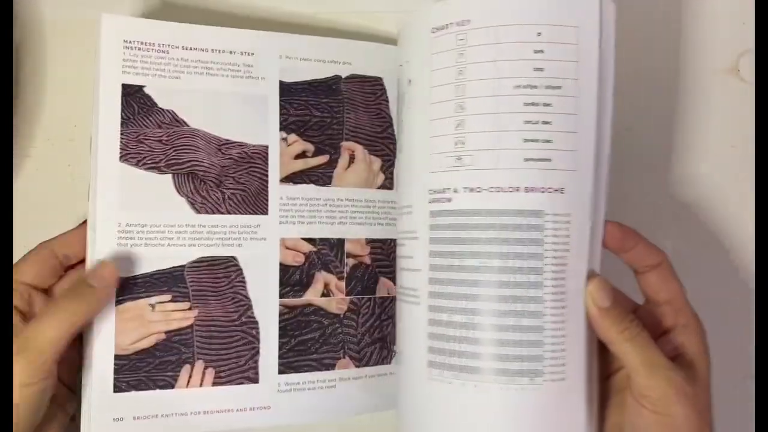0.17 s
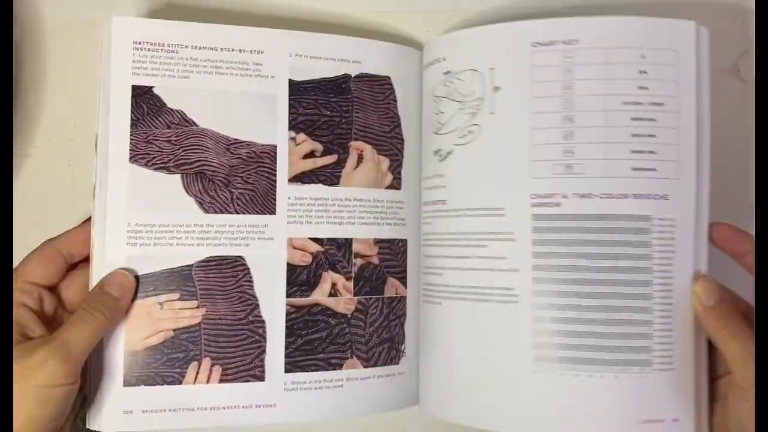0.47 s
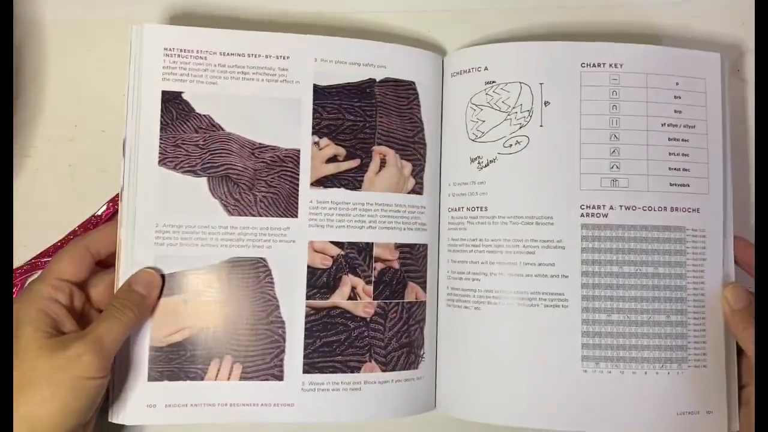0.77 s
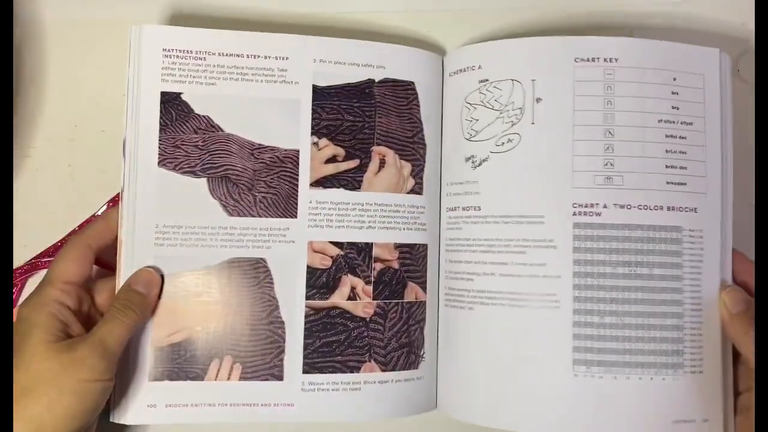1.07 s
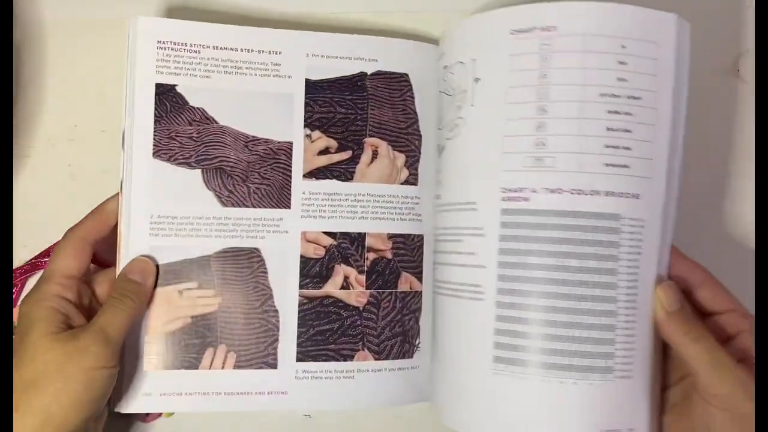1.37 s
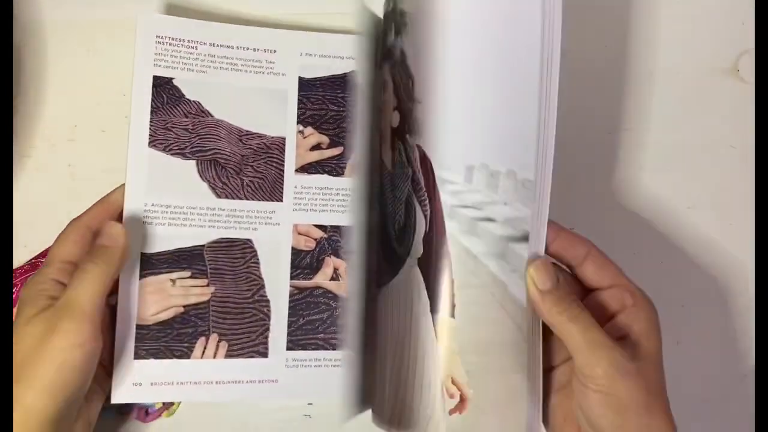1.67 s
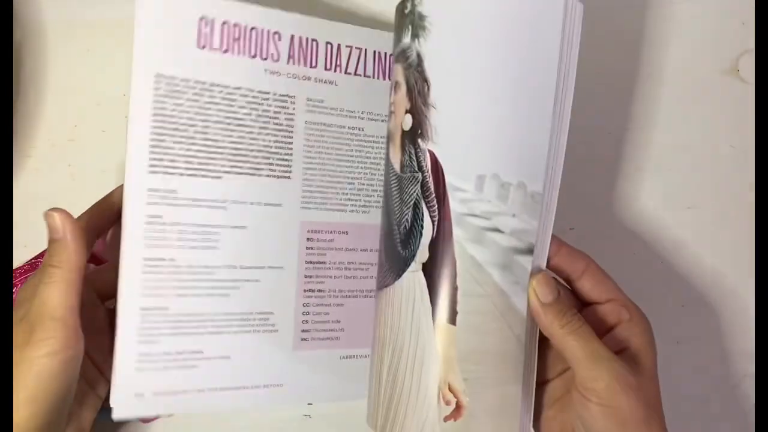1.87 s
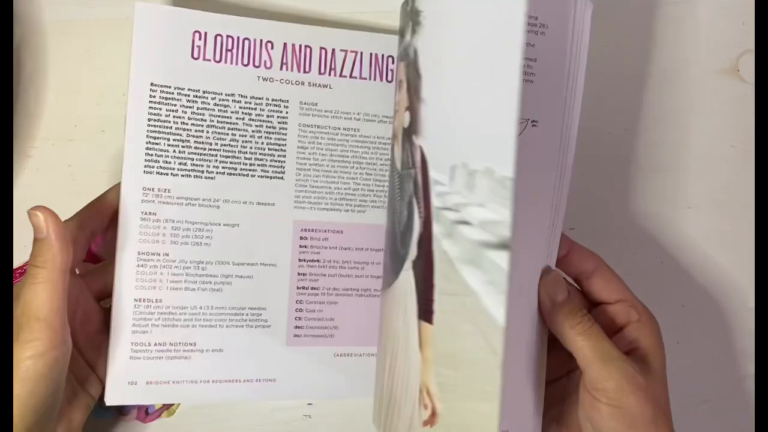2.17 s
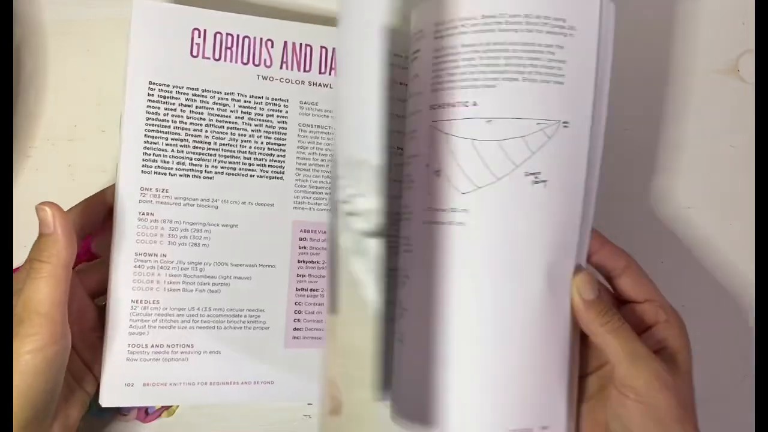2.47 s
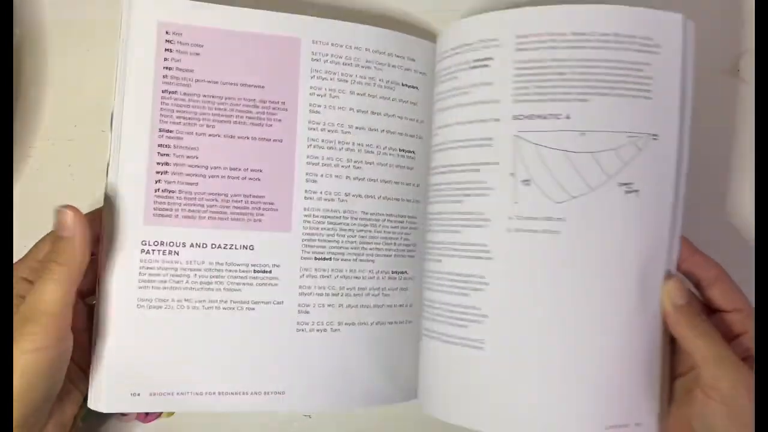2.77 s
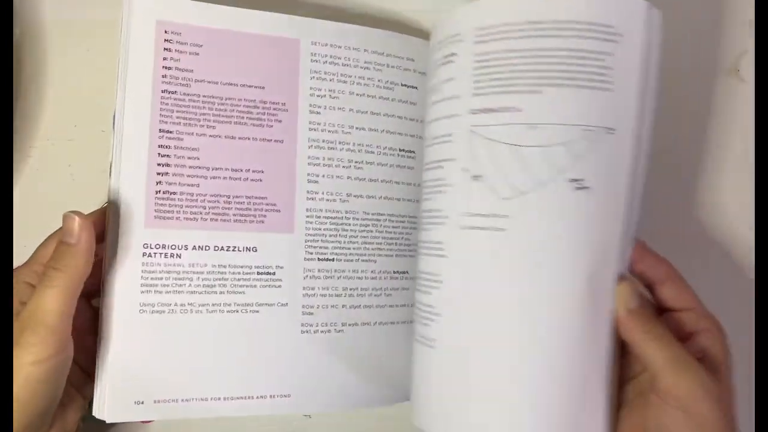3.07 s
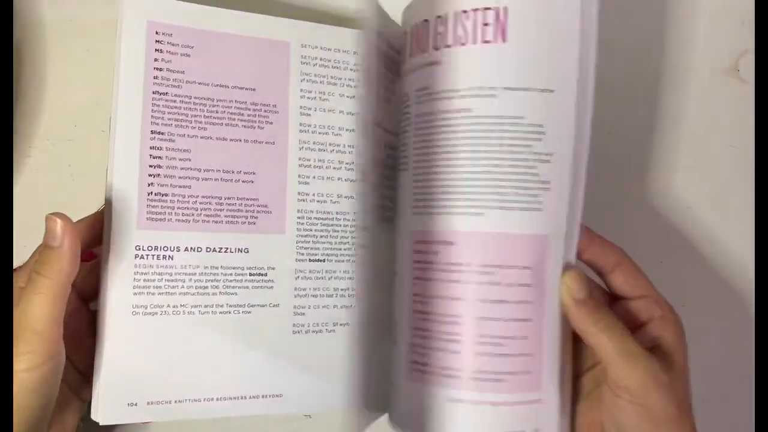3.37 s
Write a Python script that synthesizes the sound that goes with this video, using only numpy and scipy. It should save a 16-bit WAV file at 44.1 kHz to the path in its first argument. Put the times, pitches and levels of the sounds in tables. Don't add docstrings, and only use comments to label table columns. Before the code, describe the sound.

Book pages being leafed through by hand: soft dull swishes, brighter scrapes and small crisp edge snaps, strongest around the middle, with low puffs of air, close stereo microphone in a quiet room with faint ventilation rumble.

```python
import sys
import numpy as np
from scipy import signal
from scipy.fft import rfft, irfft
from scipy.io import wavfile
from scipy.ndimage import uniform_filter1d

SR = 44100
rng = np.random.default_rng(int(sys.argv[2]) if len(sys.argv) > 2 else 0)


def magnitude_from_level(level_db):
    exponent = np.asarray(level_db, float) / 20
    return 10 ** exponent


def digitize_waveform(pressure):
    field = np.atleast_2d(pressure).T
    bounded = np.clip(field, -1, 1)
    quanta = np.round(bounded * 32767).astype(np.int16)
    wavfile.write(sys.argv[1], SR, quanta)


N = 155232


def evened(x):
    return x / np.sqrt(np.mean(x ** 2) + 1e-20)


def read(points, hz):
    table_hz, value = np.transpose(points)
    return np.interp(np.log(hz + 1), np.log(table_hz + 1), value)


def drift(slow_hz, fast_hz, t):
    total = 0
    for hz in np.geomspace(slow_hz, fast_hz, num=24):
        total = total + np.sin(2 * np.pi * (hz * t + rng.random())) / np.sqrt(hz)
    return evened(total)


def ring(x, hz, width_hz):
    b, a = signal.iirpeak(hz, max(hz / min(width_hz, 7000), 0.3), SR)
    return signal.lfilter(b, a, x)


# resonance in Hz, width in Hz, boost in dB.
HOUSING = [(597, 210, 1), (1410, 42, 0.5), (2220, 140, 2), (2570, 98, 2.5), (3460, 100, 1),
           (4860, 330, 0.5), (5500, 510, 0)]
# frequency in Hz, lead in radians.
LEFT_LEAD = [(400, 0), (2000, .45), (2800, 1.), (5000, .45), (7450, 3.14), (10500, 6.28), (13500, 9.42),
             (16000, 12.4)]


def ports(pair, likeness):
    hz = np.fft.rfftfreq(pair.shape[1], 1 / SR)
    housing_db = sum(db / (1 + (2 * (hz - f) / width) ** 2) for f, width, db in HOUSING)
    left, other = rfft(pair) * magnitude_from_level(housing_db)
    same = np.clip(read(likeness, hz), 0, 1)
    lead_hz, lead = np.transpose(LEFT_LEAD)
    right = same * left + np.sqrt(1 - same ** 2) * other
    right = right * np.exp(-1j * np.interp(hz, lead_hz, lead))
    return irfft(np.array([left, right]), pair.shape[1])


# frequency in Hz, level in dB.
VENTILATION = [(25, -92), (48, -72), (300, -83.5), (380, -96), (620, -104), (1100, -101), (2000, -110),
               (4000, -121), (16000, -135)]
# pitch in Hz, width in Hz, level in dB.
ROOM_MODES = [(50.7, 4.9, -61), (74.2, 19.2, -60.5), (125, 34.9, -65), (197.3, 31.7, -69.5),
              (264.8, 40.2, -74), (461.7, 62, -89), (792, 66, -89), (950, 200, -95), (2110, 29, -108)]
# frequency in Hz, likeness 0-1.
AIR_LIKENESS = [(60, .9997), (100, .9985), (170, .988), (340, .93), (560, .15), (1300, .1), (2000, .6),
                (3000, .35), (7000, .85)]


def air():
    hz = np.fft.rfftfreq(N, 1 / SR)
    power = magnitude_from_level(read(VENTILATION, hz)) ** 2
    for mode_hz, width_hz, db in ROOM_MODES:
        power += magnitude_from_level(db) ** 2 / (1 + (2 * (hz - mode_hz) / width_hz) ** 4)
    noise = irfft(rfft(rng.standard_normal((2, N))) * np.sqrt(power), N)
    level_db, swell_db = 39, 0.4
    return ports(noise, AIR_LIKENESS) * magnitude_from_level(level_db + swell_db * drift(0.43, 5, np.arange(N) / SR))


def whine():
    t = np.arange(N) / SR
    base_hz, step_hz, up_s, down_s = 13437, 227, 1.66, 3.35
    level_db, wobble_db = -92, 5.5
    hz = base_hz + step_hz * ((t > up_s) & (t < down_s))
    tone = np.sqrt(2) * np.sin(2 * np.pi * np.cumsum(hz) / SR)
    tone *= magnitude_from_level(level_db + wobble_db * drift(0.25, 11.0, t))
    return np.array([tone, -tone])


# start in seconds, length in seconds, share of the length spent rising 0-1,
# dull swish level in dB, bright scrape level in dB.
PAGE_STROKES = [(.0, 0.64, 0.15, -75, -97), (0.201, 0.084, 0.32, -83, -78.5),
                (0.22, 0.99, 0.22, -71.5, -87.5), (0.485, 0.32, 0.45, -60.5, -99),
                (0.557, .14, 0.46, -66, -97), (.92, 0.11, 0.65, -81, -73), (0.753, 0.26, 0, -76, -83),
                (0.842, 0.12, 0.44, -65.5, -73), (0.9, 0.22, 0.24, -68.5, -65.5),
                (0.976, 0.45, 0.49, -63.5, -71.5), (1.3, 0.31, 0.2, -70.5, -76.5),
                (1.419, 0.1, 0.16, -65, -73), (1.466, 0.24, 0.29, -71.5, -71),
                (1.597, 0.045, 0.23, -59.5, -68), (1.616, 0.82, 0.09, -74.5, -82),
                (1.773, 0.2, 0.56, -68.5, -74.5), (2.181, 0.44, 0.68, -70, -81),
                (2.42, 0.41, 0.54, -69.5, -79), (2.578, .12, 0.4, -70.5, -81),
                (2.324, 0.14, 0.24, -87, -81.5), (2.717, 0.41, 0.53, -78.5, -89.5),
                (2.986, 0.2, 0.44, -76, -74.5), (3.104, 0.18, 0.1, -73, -73), (3.2, 0.27, 0.46, -83, -90.5),
                (3.387, 0.31, 0.1, -75, -79)]


def pressure(column):
    t, power = np.arange(N) / SR, np.zeros(N)
    softness = 1.3
    for row in PAGE_STROKES:
        start, length, rise = row[:3]
        progress = (t - start) / length
        top = np.clip(rise, 0.05, 0.95)
        slope = np.clip(np.minimum(progress / top, (1 - progress) / (1 - top)), 0, 1)
        power += (magnitude_from_level(row[column]) * np.sin(np.pi / 2 * slope) ** softness) ** 2
    return np.sqrt(power)


def friction(colour, column):
    slips_per_s, spread_db, smooth_share, flutter_db = 2600, -3, 0.69, 0.93
    patch_db, rub_top_hz = 3, 15800
    slips = magnitude_from_level(spread_db * np.minimum(rng.exponential(1, N), 6)) * (rng.random(N) < slips_per_s / SR)
    grain = smooth_share + (1 - smooth_share) * evened(uniform_filter1d(slips, size=5))
    drive = grain * rng.standard_normal((2, N))
    drive *= magnitude_from_level(flutter_db * drift(12, 120, np.arange(N) / SR))
    hz, _, z = signal.stft(drive, SR, nperseg=512, noverlap=384)
    hz = hz[:, None]
    patches = evened(uniform_filter1d(rng.standard_normal(z.shape[1:]), size=20, axis=1))
    shape = magnitude_from_level(read(colour, hz) + patch_db * patches) * (hz < rub_top_hz)
    rub = signal.istft(z * shape, SR, nperseg=512, noverlap=384)[1][:, :N]
    return evened(rub) * pressure(column)


# frequency in Hz, level in dB.
SWISH_COLOUR = [(250, -12.5), (480, 3.5), (850, 4.5), (1380, -1), (2100, -4.5), (3300, -8.5), (5500, -14.5),
                (15000, -53.5)]
# frequency in Hz, level in dB.
SCRAPE_COLOUR = [(1200, -9.5), (2500, -1), (4300, -5.5), (5300, 0.5), (6700, -4.5), (7600, -6.5),
                 (11000, -9), (15800, -12.5)]
# frequency in Hz, likeness 0-1.
PAPER_LIKENESS = [(500, .5), (1000, .35), (2000, .85), (2800, .4), (4000, .75), (7500, .88), (9000, .75),
                  (13000, .88)]


def pages():
    swish = friction(SWISH_COLOUR, column=3)
    scrape = friction(SCRAPE_COLOUR, column=4)
    return ports(swish + scrape, PAPER_LIKENESS)


def block():
    band = signal.butter(4, (122.5, 292), "band", fs=SR, output="sos")
    groan = evened(signal.sosfilt(band, rng.standard_normal(N)))
    return groan * magnitude_from_level(11) * uniform_filter1d(pressure(column=4), size=9000)


# time in seconds, body level in dB, body pitch in Hz, treble level in dB,
# time to fade by 60 dB in seconds.
EDGE_SNAPS = [(0.0313, -63, 1500, -93, 0.014), (.055, -65, 700, -90, 0.029), (.228, -63, 2500, -81, 0.018),
              (0.7738, -58, 2630, -87, 0.0084), (0.8774, -59, 2600, -60, 0.017),
              (1.074, -57, 2400, -74, 0.024), (1.0787, -53, 3500, -49.5, 0.0093),
              (1.0795, -51, 880, -58, 0.029), (1.3231, -46, 14000, -61, 0.032),
              (1.3244, -54, 950, -72, .03), (1.4373, -47, 2750, -36.5, 0.0072),
              (1.4395, -58, 1900, -59, 0.022), (1.6073, -81, 2370, -66, 0.02),
              (1.611, -59, 2130, -58, 0.03), (2, -64, 3100, -60, 0.0046), (2.018, -59, 4500, -51, 0.012),
              (2.0194, -50.5, 1250, -75, 0.019), (2.9232, -59, 885, -75, 0.011),
              (3.1315, -58, 1970, -66, 0.032), (3.1339, -57, 2000, -59, 0.011),
              (3.1451, -52, 5770, -41.5, 0.01), (3.1452, -45.5, 1530, -74, 0.015),
              (3.4084, -74, 1500, -75, .012)]
# pitch in Hz, width in Hz, level in dB.
CRACK_MODES = [(3400, 1600, -4.5), (5280, 470, -4), (8920, 2880, 1.5), (11170, 3900, -0.5),
               (14000, 1500, -12)]
# frequency in Hz, likeness 0-1.
SNAP_LIKENESS = [(500, .9), (5500, .9), (7000, .88), (9000, .85), (13500, .65), (16000, .8)]


def snaps():
    rise_s, tail_db, tail_s = 0.00057, -13, 0.05
    flick = 13
    body_width, body_late_s = 0.69, 0.00034
    echo_s, echo_db = 0.0057, -18
    t, out = np.arange(4000) / SR, np.zeros((2, N + 5000))
    for start, body_db, hz, treble_db, fade_s in EDGE_SNAPS:
        shape = magnitude_from_level(-60 * t / fade_s) + magnitude_from_level(tail_db - 60 * t / tail_s)
        burst = rng.standard_normal((2, len(t))) * shape * np.minimum(t / rise_s, 1)
        burst[:, round(rise_s * SR)] += flick * shape[0] / 2
        treble = 0
        for f, width, db in CRACK_MODES:
            treble = treble + magnitude_from_level(db) * evened(ring(ring(burst, f, width), f, width))
        body = ring(ring(burst, hz, hz * body_width), hz, hz * body_width)
        body = np.roll(body, round(body_late_s * SR), axis=1)
        sound = magnitude_from_level(body_db) * body / abs(body[0]).max()
        sound += magnitude_from_level(treble_db) * treble / abs(treble[0]).max()
        for late_s, db in ((0, 0), (echo_s, echo_db)):
            out[:, round((start + late_s) * SR):][:, :len(t)] += magnitude_from_level(db) * sound
    return ports(out[:, :N], SNAP_LIKENESS)


# start in seconds, length in seconds, pitch in Hz, level in dB.
AIR_PUSHES = [(0.082, 0.11, 79.4, -44), (.23, 0.078, 78.7, -39), (0.432, 0.15, 79, -53.5),
              (0.664, 0.088, 68.7, -46), (0.823, 0.16, 80.2, -45), (1.038, 0.063, 77, -41.5),
              (1.422, 0.067, 77.7, -42), (1.959, 0.05, 77, -43), (2.169, 0.12, 71.6, -44.5),
              (2.733, 0.065, 72, -45.5), (2.841, 0.11, 76.3, -42), (.1, 0.083, 140, -49.5),
              (0.782, 0.095, 135.6, -46), (.88, .1, 138.7, -48), (1.277, 0.11, 262.2, -55),
              (2.58, 0.097, 140, -51.5), (3.22, 0.12, 77.3, -46), (3.331, 0.15, 200.3, -55.5)]


def pushes():
    out = np.zeros(N + SR)
    for start, length, hz, db in AIR_PUSHES:
        t = np.arange(0, length, 1 / SR)
        swell = np.sin(np.pi * t / length)
        out[round(start * SR):][:len(t)] += magnitude_from_level(db) * swell * np.sin(2 * np.pi * hz * t)
    return out[:N]


def scene():
    return air() + whine() + pages() + block() + snaps() + pushes()


def joint_gate(x):
    from_hz, under_db, keep_db = 6000, -6.5, -95
    top_from_hz, top_keep_db, dropped_db = 13850, -112, -24
    sum_and_difference = np.array([x[0] + x[1], x[0] - x[1]]) / 2
    hz, _, z = signal.stft(sum_and_difference, SR, nperseg=1024, noverlap=768)
    hz = hz[:, None]
    power = uniform_filter1d(uniform_filter1d(abs(z) ** 2, size=14, axis=1), size=5, axis=2)
    level_db = 10 * np.log10(abs(power) + 1e-20)
    slow_db = uniform_filter1d(level_db, size=40, axis=2)
    weak = (slow_db - slow_db[::-1] < under_db) & (hz > from_hz) & (level_db < keep_db)
    faint = (hz > top_from_hz) & (level_db < top_keep_db)
    gated = z * np.where(weak | faint, magnitude_from_level(dropped_db), 1)
    mid, side = signal.istft(gated, SR, nperseg=1024, noverlap=768)[1][:, :N]
    return np.array([mid + side, mid - side])


def roll_off(x):
    return signal.sosfilt(signal.butter(12, 16860, fs=SR, output="sos"), x)


def record(dry):
    edge = signal.firwin(255, 16400, fs=SR)
    limited = signal.oaconvolve(joint_gate(dry), edge[None], "same")
    return roll_off(limited)


dry = scene()
out = record(dry)
digitize_waveform(out)
```